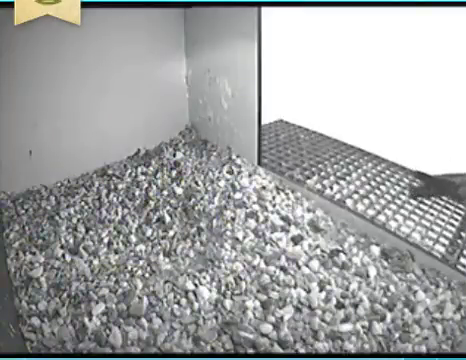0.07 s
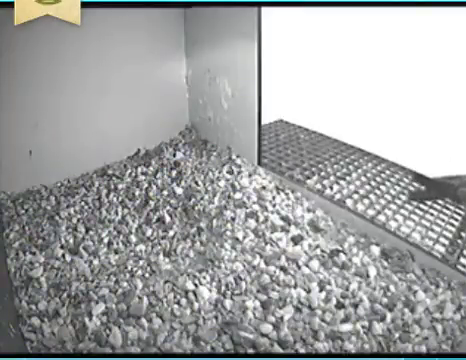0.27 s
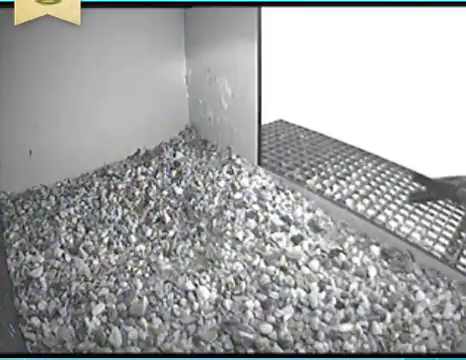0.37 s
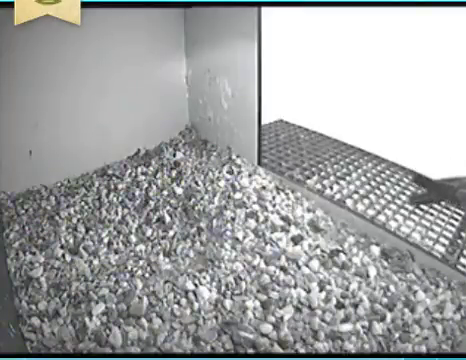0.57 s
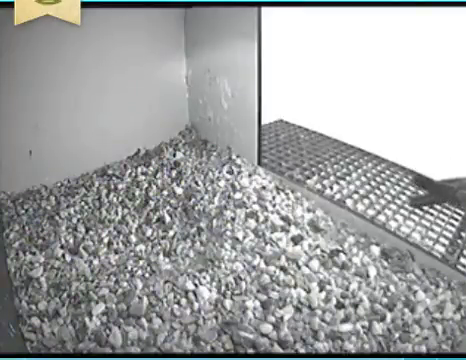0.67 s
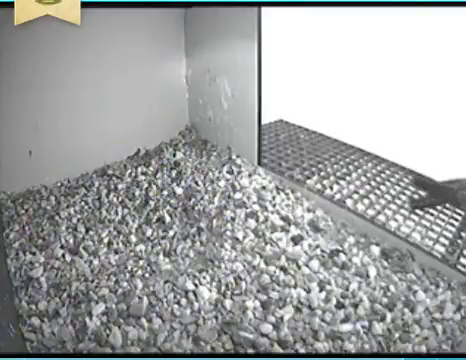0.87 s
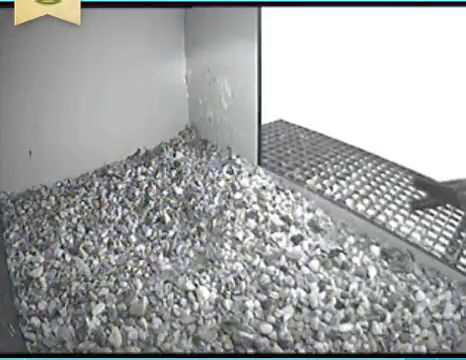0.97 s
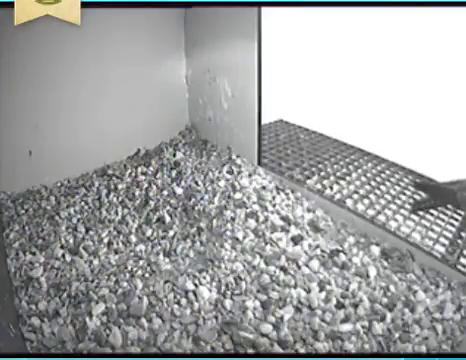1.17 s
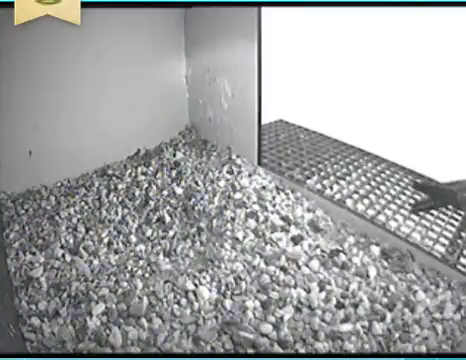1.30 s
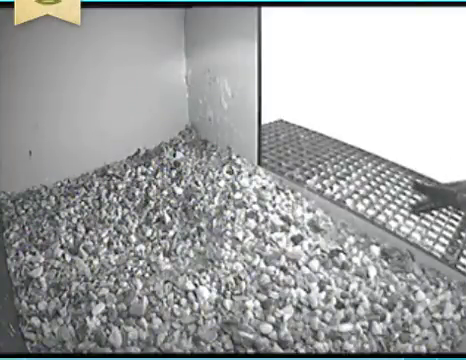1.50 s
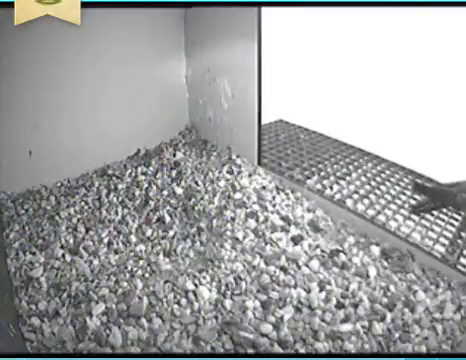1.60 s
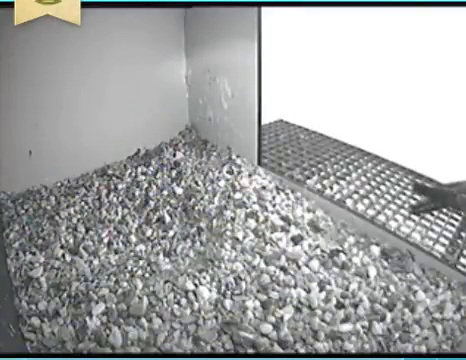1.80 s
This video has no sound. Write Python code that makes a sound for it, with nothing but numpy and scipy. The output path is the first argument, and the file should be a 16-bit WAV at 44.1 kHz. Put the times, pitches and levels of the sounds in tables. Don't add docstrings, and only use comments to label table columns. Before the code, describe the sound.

A falcon cackles once in a small nest box: after faint wheezes, a rising chip at 0.22 seconds, then from 0.28 a steep falling whistle that breaks into lower tones, breathy rasp and throat clicks until 0.35. A short hollow boom and box echo fade by 0.45. Low gusty hum, distant traffic slowly growing and soft hiss continue to 1.85, with barely audible far birds around 1.4 to 1.65.

```python
import sys
import numpy as np
from scipy import signal
from scipy.fft import rfft, irfft
from scipy.io import wavfile

SR = 44100
rng = np.random.default_rng(int(sys.argv[2]) if len(sys.argv) > 2 else 0)


def materialize(psi):
    bounded = np.clip(np.atleast_2d(psi).T, -1, 1)
    quanta = np.round(bounded * 32767).astype(np.int16)
    wavfile.write(sys.argv[1], SR, quanta)


def linear_from_db(decibels):
    return 10 ** (np.asarray(decibels, float) / 20)


N = 81585
T = np.arange(N) / SR

TONE_ROUGH, FLUTTER_HZ, WAVER = .15, 200, .007


def rms_one(x):
    return x / np.sqrt(np.mean(x ** 2) + 1e-20)


def curve(rows):
    return np.interp(T, *np.transpose(rows))


def drift(rate_hz):
    r = np.exp(-2 * np.pi * rate_hz / SR)
    return rms_one(signal.lfilter([1], [1, -2 * r, r * r], rng.standard_normal(N + SR))[SR:])


def coloured(spectrum):
    hz, db = np.transpose(spectrum)
    f = np.arange(N // 2 + 1) * SR / N + 1
    gain = linear_from_db(np.interp(np.log(f), np.log(hz), db))
    return rms_one(irfft(rfft(rng.standard_normal(N)) * gain, N))


def resonance(x, hz, width_hz):
    r = np.exp(-np.pi * width_hz / SR)
    poles = [1, -2 * r * np.cos(2 * np.pi * hz / SR), r * r]
    return signal.lfilter([(1 - r * r) / 2, 0, (r * r - 1) / 2], poles, x)


def high_pass(x, order, hz):
    return signal.sosfilt(signal.butter(order, hz, "high", fs=SR, output="sos"), x)


def band_pass(x, order, low_hz, high_hz):
    return signal.sosfilt(signal.butter(order, [low_hz, high_hz], "band", fs=SR, output="sos"), x)


def tones(rows, rough):
    attack_share, bend = .4, .7
    out, flutter = np.zeros(N), drift(FLUTTER_HZ)
    for k, (start, length, first_hz, last_hz, db) in enumerate(rows):
        u = np.clip((T - start) / length, 0, 1)
        shake = np.roll(flutter, k * SR // 20)
        waver = np.roll(flutter, -k * SR // 20 - SR // 2)
        hz = (first_hz + (last_hz - first_hz) * u ** bend) * (1 + WAVER * waver)
        shape = np.sin(np.pi / 2 * np.minimum(u / attack_share, (1 - u) / (1 - attack_share)))
        level = linear_from_db(db) * np.sqrt(2) * shape * (1 + rough * shake)
        out += level * np.sin(2 * np.pi * np.cumsum(hz) / SR)
    return out


def whistle(rows, shake=1):
    burr, burr_hz = .11, 700
    s, path_hz, db = np.transpose(rows)
    level = linear_from_db(np.interp(T, s, db, left=-150, right=-150))
    level = level * (1 + shake * TONE_ROUGH * drift(FLUTTER_HZ) + burr * drift(burr_hz))
    hz = np.interp(T, s, path_hz) * (1 + shake * WAVER * drift(FLUTTER_HZ))
    return np.sqrt(2) * level * np.sin(2 * np.pi * np.cumsum(hz) / SR)


def boxed(modes, count):
    air, rung = rng.standard_normal((count, N + SR)), 0
    for k, (hz, width_hz, db) in enumerate(modes):
        ring = air[k % count]
        for _ in range(count):
            ring = resonance(ring, hz, width_hz)
        rung = rung + linear_from_db(db) * ring * (-1) ** (k > 0)
    return rms_one(high_pass(rung, 4, 82)[SR:])


def hum():
    # [t/s, level/dB]
    gusts = [(0, -42), (.03, -49.5), (.12, -48), (.31, -39.5), (.45, -45), (.63, -48.5), (.95, -46.5),
             (1.07, -48.5), (1.14, -43), (1.3, -46), (1.45, -46), (1.5, -43.5), (1.54, -38.5), (1.6, -40),
             (1.68, -46), (1.75, -42), (1.79, -49.5), (1.825, -40)]
    # [t/s, level/dB]
    traffic = [(0, -62.5), (.6, -59.5), (1.2, -57.5), (1.85, -53.5)]
    # [f/Hz, width/Hz, level/dB]
    low_modes = [(324, 53.1, -0.5), (375, 68.8, -0.5), (435.6, 20.7, -8), (467, 11, -6.5)]
    high_modes = [(230, 120, -7), (560, 160, -4), (700, 170, -6), (815, 60, 6), (890, 55, 0)]
    # [f/Hz, level/dB per Hz]
    outside = [(530, 0), (900, -1), (1360, -19), (1690, 2), (4000, -8), (5200, -17), (8800, -120)]
    lumpy_db, open_db = 0.77, -14
    wind = linear_from_db(curve(gusts) + lumpy_db * drift(25)) * boxed(low_modes, count=1)
    road = boxed(high_modes, count=2) + linear_from_db(open_db) * coloured(outside)
    return wind + linear_from_db(curve(traffic)) * road


def hiss():
    # [f/Hz, level/dB per Hz]
    colour = [(590, -25), (1000, -1.5), (1460, -6), (1690, 1), (1840, -9), (5630, -3), (10200, -8),
              (13200, -88), (22000, -120)]
    # [t/s, level/dB]
    duck = [(0, -3), (.2, -1), (.37, -5), (.55, -1), (.8, -0.5), (1.2, -1), (1.85, 1)]
    return linear_from_db(-60 + curve(duck)) * coloured(colour)


def faint_tones(rows):
    return linear_from_db(-.5) * tones(rows, rough=.5)


def wheezes_and_echoes():
    # [start/s, length/s, first f/Hz, last f/Hz, peak level/dB]
    faint_notes = [(.122, .035, 2150, 2220, -58), (.155, .035, 2220, 2200, -57), (.19, .03, 2270, 2230, -49),
                   (.366, .010, 3000, 3050, -39), (.375, .012, 3080, 3020, -38), (.36, .02, 3350, 3250, -45),
                   (.388, .03, 3110, 3050, -51), (.385, .022, 2160, 2150, -44), (.407, .032, 2125, 2135, -45),
                   (.436, .022, 2150, 2150, -50), (.395, .05, 1640, 1630, -57), (.365, .025, 6500, 6400, -53),
                   (.37, .05, 5600, 5550, -57), (.36, .04, 7400, 7350, -59), (.415, .025, 5900, 5850, -58),
                   (.353, .01, 3650, 3600, -42)]
    return faint_tones(faint_notes)


def rasp():
    # [t/s, level/dB]
    effort = [(.19, -60), (.205, -51), (.222, -39.5), (.27, -37), (.30, -40.5), (.34, -34), (.358, -40.5),
              (.40, -51.5), (.46, -59.5)]
    # [f/Hz, level/dB per Hz]
    colour = [(350, -23), (600, -3.5), (856, -11), (1140, -4.5), (1800, -6.5), (2210, -1), (2900, -3.5),
              (4040, -3), (10200, -29.5), (13200, -35), (22000, -120)]
    # [f/Hz, width/Hz, level/dB]
    throat = [(1060, 60, -4), (2263, 22, -12), (2780, 26, -6.5), (3350, 32, -7.5), (4010, 10, -16),
              (5200, 49, -5), (5810, 55, -2), (7200, 110, 6.5)]
    grain_hz, grain_db = 200, 1.5
    air = linear_from_db(curve(effort) + grain_db * drift(grain_hz)) * coloured(colour)
    return air + sum(linear_from_db(db) * resonance(air, hz, width_hz) for hz, width_hz, db in throat)


def voice():
    chip = [(.2185, 3600, -48), (.222, 3480, -32), (.226, 3450, -25), (.229, 3640, -26), (.233, 3720, -26),
            (.238, 3880, -33), (.241, 4000, -28), (.246, 4050, -33), (.250, 4060, -50)]
    fall = [(.276, 4050, -48), (.280, 3680, -27), (.285, 3350, -20), (.287, 3290, -26), (.2915, 3170, -25),
            (.2945, 3070, -12.5), (.2995, 3000, -14), (.3015, 2900, -25), (.309, 2700, -40)]
    middle = [(.299, 2200, -45), (.303, 2120, -23), (.306, 2100, -24), (.310, 2091, -17.5),
              (.314, 2085, -18.5), (.318, 2060, -25), (.321, 2040, -40)]
    octave = [(.277, 7200, -60), (.282, 6950, -42), (.289, 6700, -45), (.295, 6500, -45), (.302, 6350, -49),
              (.31, 6200, -56)]
    # [start/s, length/s, first f/Hz, last f/Hz, peak level/dB]
    broken = [(.320, .016, 1980, 1960, -27), (.326, .013, 970, 995, -27), (.327, .009, 2910, 2900, -24),
              (.336, .006, 2780, 2720, -28), (.3415, .006, 2700, 2650, -30), (.326, .012, 4420, 4430, -31),
              (.302, .018, 5560, 5480, -37), (.284, .020, 3640, 3700, -33), (.258, .018, 2250, 2230, -40),
              (.258, .02, 3450, 3400, -41), (.236, .014, 2800, 2700, -41), (.226, .01, 2100, 1950, -43),
              (.328, .012, 2480, 2350, -36), (.345, .012, 1150, 1100, -38)]
    partials = [(.222, .026, 6900, 7650, -46), (.278, .025, 10200, 9300, -55), (.207, .02, 5350, 5150, -46),
                (.229, .014, 5350, 5150, -41), (.258, .02, 4600, 4550, -45), (.255, .02, 5800, 5750, -47),
                (.325, .022, 6500, 6200, -48), (.322, .014, 5400, 5300, -44), (.305, .012, 2960, 3030, -39),
                (.30, .03, 8800, 8500, -54), (.33, .018, 9100, 9300, -53), (.24, .03, 9000, 8800, -57)]
    whistled = sum(whistle(path) for path in (chip, fall, middle, octave))
    return whistled + tones(broken, TONE_ROUGH) + linear_from_db(-3) * tones(partials, 2 * TONE_ROUGH)


def snaps():
    # [t/s, level/dB, ring f/Hz]
    clicks = [(0.222, -40, 5200), (.2998, -29, 3600), (0.3027, -23.5, 2600), (0.303, -37.5, 6000),
              (0.3289, -32, 3300), (0.3298, -37.5, 5500), (.3350, -26, 2900), (0.3386, -24.5, 2800),
              (0.341, -31.5, 4300), (0.3437, -26, 2700), (0.3465, -41, 6000), (0.347, -28.5, 2400)]
    width_hz = 1200
    out = np.zeros(N)
    for s, db, hz in clicks:
        click = 1e-18 + (np.arange(N) == int(s * SR))
        ring = resonance(resonance(click, hz, width_hz), hz, width_hz)
        out += linear_from_db(db) * SR / width_hz * ring
    return out


def echoes(x):
    # [delay/s, level/dB]
    walls = [
        (.0031, -15),
        (.0057, -16),
        (.0089, -17),
        (.0135, -19),
    ]
    onset_s, late_db, t60_s, end_s = 0.017, -19.5, 0.27, .455
    tail = rng.standard_normal(N) * (T > onset_s) * linear_from_db(-60 * T / t60_s)
    tail = tail / np.sqrt(np.sum(tail ** 2))
    late = linear_from_db(late_db) * signal.fftconvolve(x, tail)[:N]
    late = late * np.clip((end_s - T) / 0.016, 0, 1)
    return late + sum(linear_from_db(db) * np.roll(x, int(s * SR)) for s, db in walls)


def cackle():
    gap_hz, gap_width_hz, gap_from_s = 3660, 420, .372
    call = high_pass(linear_from_db(-2) * voice() + rasp() + snaps(), 4, 320)
    bird = call + echoes(call)
    return bird - np.clip((T - gap_from_s) * 100, 0, 1) * resonance(bird, gap_hz, gap_width_hz)


def held_lines():
    arch = [(.233, 1080, -60), (.241, 1140, -44), (.249, 1250, -39.5), (.255, 1275, -42), (.259, 1200, -43),
            (.263, 1157, -39), (.273, 1159, -43), (.282, 1200, -50), (.29, 1207, -62)]
    ring = [(.244, 4050, -50), (.258, 4064, -47), (.282, 4025, -37), (.296, 4100, -45), (.307, 4110, -35),
            (.316, 4045, -26), (.328, 4020, -33), (.338, 4025, -31), (.350, 4040, -46)]
    ring_tail = [(.352, 4090, -60), (.362, 4090, -44), (.38, 4050, -45.5), (.398, 4015, -47),
                 (.402, 4000, -57), (.41, 3980, -54), (.425, 3960, -62), (.44, 3960, -70)]
    return sum(whistle(path, shake=.4) for path in (arch, ring, ring_tail))


def glow():
    # [t/s, level/dB]
    level = [(.33, -70), (.36, -50), (.40, -52), (.436, -53), (.442, -59), (.46, -70)]
    # [f/Hz, level/dB per Hz]
    colour = [(880, -41), (1500, -8), (2300, 0), (3200, -3), (3650, -30), (4200, 0), (7400, -5),
              (8000, -16), (22000, -70)]
    return linear_from_db(curve(level)) * coloured(colour)


def boom():
    # [f/Hz, level/dB, t60/s]
    modes = [(362, -15.5, .10), (474, -26.5, .07), (662, -36, .05), (830, -38, .04), (1100, -42, .06),
             (1640, -44, .05), (60, -60, .15)]
    start_s, rise_s = .3308, .013
    stop_s, stop_t60_s, left_db = .356, .02, -11
    t = np.maximum(T - start_s, 0)
    push = np.sin(np.pi / 2 * np.minimum(t / rise_s, 1)) ** 2
    push = push * linear_from_db(np.maximum(-60 * np.maximum(T - stop_s, 0) / stop_t60_s, left_db))
    rung = np.zeros(N)
    for k, (hz, db, t60) in enumerate(modes):
        decay = linear_from_db(db - 60 * np.maximum(t - rise_s, 0) / t60)
        rung += (-1) ** k * decay * np.sqrt(2) * push * np.sin(2 * np.pi * hz * t)
    return rung + high_pass(.1 * drift(600) * rung, 6, 280)


def far_birds():
    # [start/s, length/s, first f/Hz, last f/Hz, peak level/dB]
    calls = [(1.402, .018, 1900, 1900, -59), (1.422, .016, 1880, 1900, -62), (1.39, .05, 2700, 2650, -66),
             (1.56, .016, 1700, 1690, -62), (1.57, .035, 2130, 2250, -63), (1.58, .04, 1630, 1750, -64),
             (1.60, .022, 2680, 2650, -62), (1.625, .045, 1550, 1950, -63)]
    return faint_tones(calls)


def scene():
    surroundings = hum() + hiss() + far_birds()
    bird = wheezes_and_echoes() + cackle() + held_lines() + glow()
    mono = surroundings + bird + boom()
    return np.array([mono, mono])


def top_cut(x):
    return signal.sosfilt(signal.butter(12, 15720, fs=SR, output="sos"), x)


def record(dry):
    mid = signal.sosfilt(signal.ellip(12, .5, 70, 10520, fs=SR, output="sos"), dry[0])
    mid = high_pass(mid, 2, 116)
    image = band_pass(mid * (-1.) ** np.arange(N), 3, 11300, 11870)
    lows = np.roll(band_pass(mid, 4, 300, 1600), 300)
    side = -linear_from_db(-24) * resonance(lows, hz=864, width_hz=1000)
    mid = mid + linear_from_db(-10) * image
    return top_cut(np.array([mid + side, mid - side]))


dry = scene()
out = record(dry)
materialize(out)
```